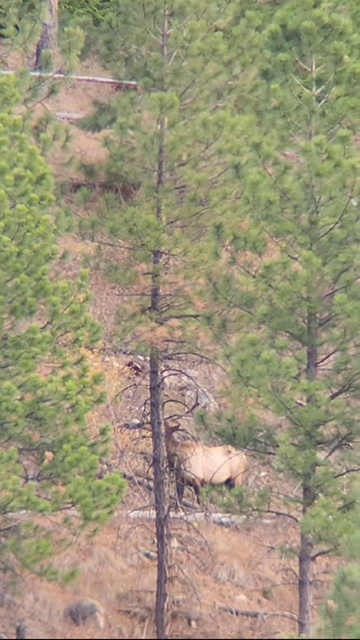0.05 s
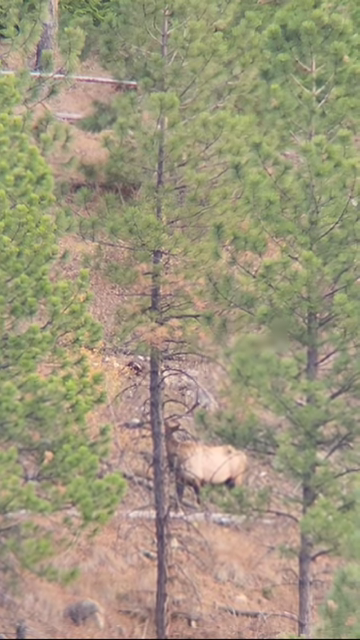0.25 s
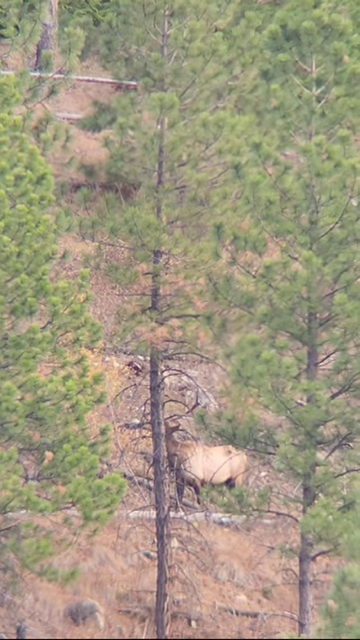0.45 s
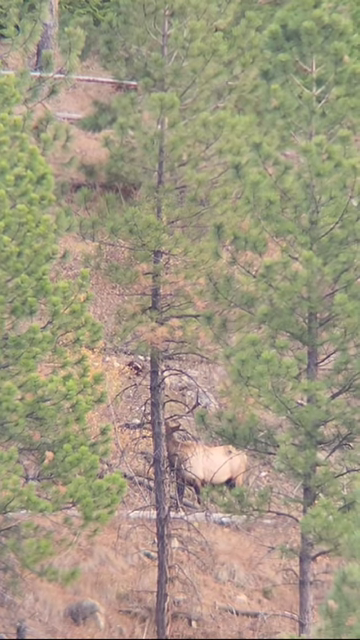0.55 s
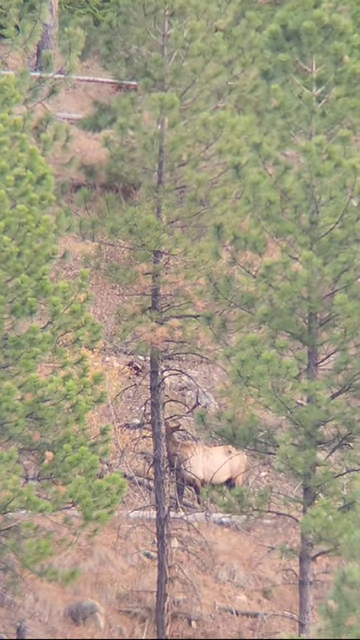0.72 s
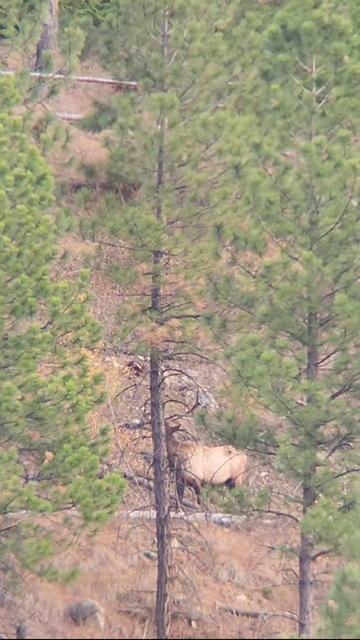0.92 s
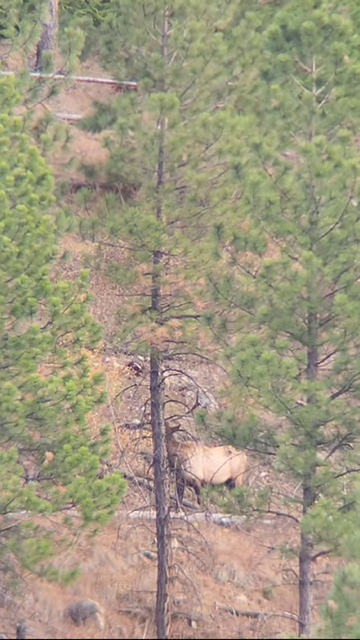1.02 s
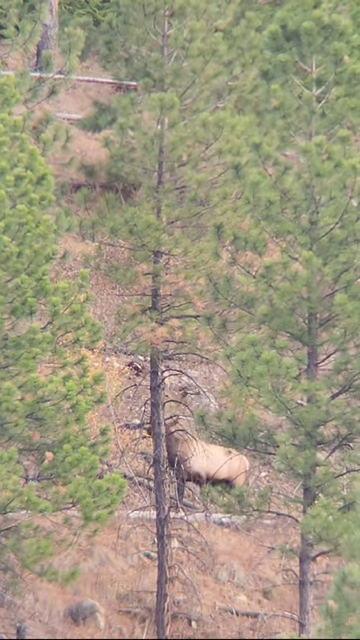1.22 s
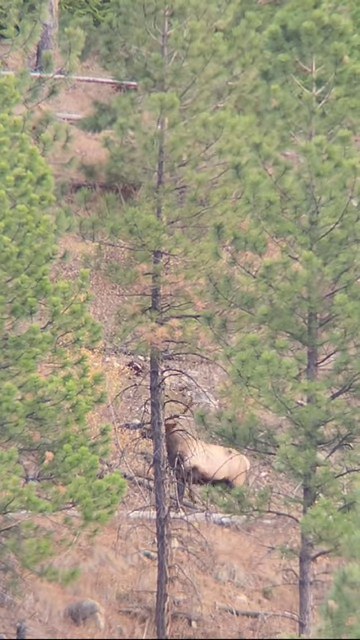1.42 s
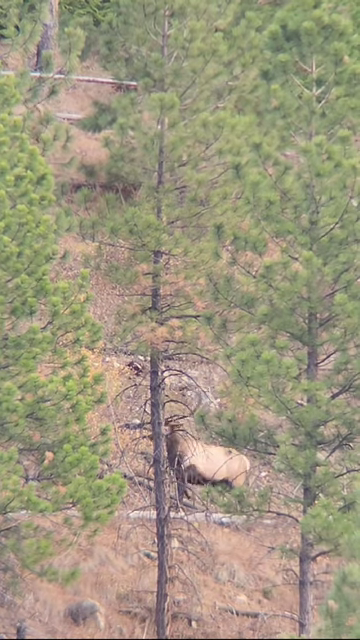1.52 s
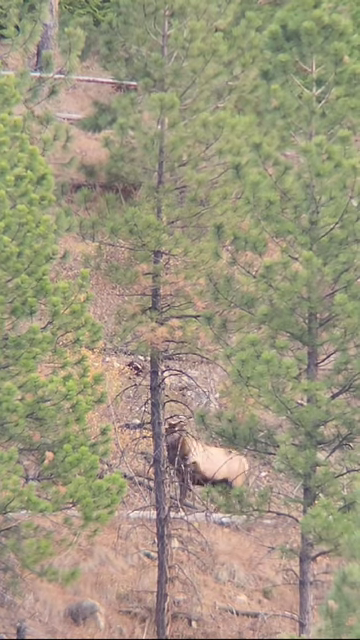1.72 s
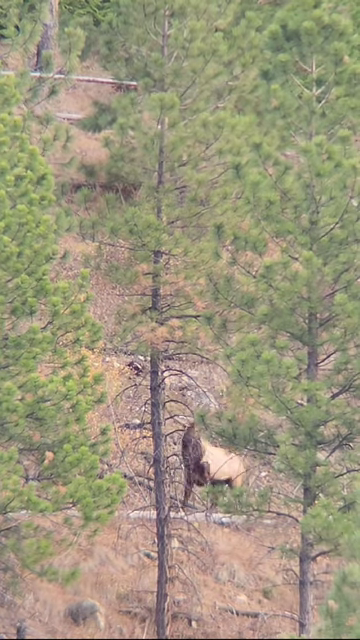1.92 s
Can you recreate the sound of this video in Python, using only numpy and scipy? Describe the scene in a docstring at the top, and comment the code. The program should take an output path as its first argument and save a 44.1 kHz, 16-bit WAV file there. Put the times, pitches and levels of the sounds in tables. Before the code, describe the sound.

One sharp, overloaded gunshot outdoors, then clattering echoes and low thumps dying away among trees

```python
"""A faint outdoor hush on a wooded hillside, then one rifle shot close to two microphones, with a pre-echo (noise
swelling until the shot) smeared ahead of it. The blast is N-shaped shock fronts, a ring of decaying sines,
a noise roar and a noise spray from nearby ground and trunks; it overloads the input. Trunks and slopes send it
back as shaped noise that the air dulls with distance, with low thumps (windowed sines), sharper slaps (noise
bursts with a ring) and clean cracks."""
import sys
import numpy as np
from scipy import signal
from scipy.fft import rfft, irfft
from scipy.io import wavfile
from scipy.ndimage import uniform_filter1d

SR = 44100
rng = np.random.default_rng(int(sys.argv[2]) if len(sys.argv) > 2 else 0)


def inscribe(sig):
    """Save sig as 16-bit PCM at rate SR to the path in sys.argv[1].

    A 1-D sig is mono; a 2-D sig holds one channel per row.
    Samples are clipped to [-1, 1] before scaling.
    """
    pcm = np.round(np.clip(np.atleast_2d(sig).T, -1, 1) * 32767)
    wavfile.write(sys.argv[1], SR, pcm.astype(np.int16))


def to_linear_factor(level_db):
    """Convert decibel levels (scalar or array-like) to linear amplitude factors."""
    exponent = np.asarray(level_db, float) / 20
    return 10 ** exponent


N = 85995  # length [samples]
SHOT_S = .2535

# sound coming back from the hillside:
# (time [s], hiss level [dB], rumble level [dB], low-mid body level [dB])
RETURN = [(0.3, -38, -55, -86), (0.36, -46.5, -65, -58), (0.428, -38.5, -47, -44), (0.485, -43, -53, -48.5),
          (0.51, -39.5, -48, -52), (0.545, -38.5, -54, -60), (0.585, -38.5, -46.5, -44.5),
          (0.635, -47.5, -46.5, -47.5), (0.751, -44.5, -46, -44), (0.99, -59, -53, -61),
          (1.014, -50.5, -52, -56.5), (1.07, -60, -51.5, -59.5), (1.233, -65.5, -61.5, -81),
          (1.95, -77, -83.5, -98)]


def on_log_axis(table, hz):
    """Read a (frequency [Hz], value) table on a log frequency axis."""
    table = np.array(table, float)
    return np.interp(np.log(hz), np.log(table[:, 0]), table[:, 1])


def band(spec, hz, octaves):
    """One bell-shaped band out of a spectrum, rms 1."""
    f = np.arange(spec.shape[-1]) * SR / N + 1e-3
    bell = np.exp(-.5 * (np.log2(f / hz) / octaves) ** 2)
    y = irfft(spec * bell, N)
    return y / np.sqrt(np.mean(y ** 2, axis=-1, keepdims=True))


def walk(rate):
    """Random levels held 1 / rate s and slewed twice; spread near 1."""
    k = int(SR / rate)
    held = np.repeat(rng.standard_normal(N // k + 1), k)
    return 1.1 * uniform_filter1d(uniform_filter1d(held, k), k)[:N]


def diffuse(colour, grain_db, patchy_db, flicker_db, loss_db=lambda hz: 0):
    """Sound from all around: noise in third octaves, each with its own loss over time; rms near 1 without loss."""
    # side minus mid by frequency: (frequency [Hz], level difference [dB])
    side_width = [(60, -13.5), (110, -22), (200, -3.5), (380, -10.5), (700, 3), (1290, 3.5), (2380, -2),
                  (4400, 0), (8120, 1), (15000, 0)]
    # grain: random samples of the noise are lifted
    lift = to_linear_factor(grain_db * rng.exponential(size=(2, N)))
    spec = rfft(rng.standard_normal((2, N)) * lift)
    centres = 28 * 2 ** np.arange(0, 9.3, 1 / 3)
    db = on_log_axis(colour, centres) + 10 * np.log10(centres)  # per Hz to per band
    db -= 10 * np.log10(np.sum(10 ** (db / 10)))
    out, shared = 0, walk(70)
    for hz, band_db in zip(centres, db):
        mid, side = band(spec, hz, 1 / 6)
        gain = to_linear_factor(band_db - loss_db(hz) + patchy_db * shared + flicker_db * walk(45))
        out = out + gain * (mid + to_linear_factor(on_log_axis(side_width, hz)) * side * np.array([[1], [-1]]))
    return out


def place(out, s, piece, pan_db, lag_s=0.):
    """Copy of the stereo track with a short sound laid in; pan is left minus right, lag delays the left."""
    out = out.copy()
    for ch, sign in enumerate((1, -1)):
        i = int((s + (lag_s if ch == 0 else 0)) * SR)
        n = min(len(piece), N - i)
        out[ch, i:i + n] += to_linear_factor(sign * pan_db / 2) * piece[:n]
    return out


def hush():
    """The faint outdoor background: steady coloured noise from all around."""
    # (frequency [Hz], relative density [dB per Hz])
    hush_colour = [(15, -29), (25, 13), (235, -22.5), (837, -4), (908, -12.5), (1010, -18), (1360, -16.5),
                   (15900, -70.5)]
    return to_linear_factor(-69.5) * diffuse(hush_colour, 0.19, 0.31, 1.6)


def pre_echo(t):
    """A pre-echo: noise smeared ahead of the shot, swelling until it."""
    # (frequency [Hz], relative density [dB per Hz])
    pre_echo_colour = [(24, -34.5), (40, -5), (162, -4), (606, -13.5), (1450, -8), (1770, -9.5),
                       (3740, -21), (5440, -14), (6010, -26), (7710, -16), (15500, -30.5)]
    start_s, fade_in_s, end_db, rise_db_per_s = 0.2167, 0.0044, -22, 495.5
    u = t - SHOT_S
    swell = np.clip((t - start_s) / fade_in_s, 0, 1) * to_linear_factor(end_db + rise_db_per_s * np.minimum(u, 0))
    return (u < 0) * swell * diffuse(pre_echo_colour, 0.3, 0, 0.26)


def shock_fronts():
    """Shock fronts in quick succession: pressure jumps, falls in a straight line and jumps back, an N shape."""
    # (time [s], level before the push factor [dB], length of the N [s], lag of the left microphone [s],
    #  signed factor of the first push [ratio])
    fronts = [(0.2431, -21, 0.0078, 0.00034, -2.56), (0.2517, -9, 0.00065, 0.00062, -0.5),
              (0.256, -11, 0.0017, 0.000068, -0.68), (0.257, -21, 0.00091, 0.00065, 0.38),
              (0.2607, -7, 0.0038, 0.00058, -0.94)]
    out = np.zeros((2, N))
    for s, db, length_s, lag_s, push in fronts:
        ramp = np.linspace(1, -1, int(length_s * SR))
        rounded = np.convolve(ramp, np.ones(7) / 7)
        out = place(out, s, push * to_linear_factor(db) * rounded, 0, lag_s)
    return out


def blast_ring():
    """A short ring after the shot: a sum of sines, each dying away exponentially."""
    # (frequency [Hz], starting level [dB], time to fall 60 dB [s])
    ring_modes = [(60, -13.5, 0.073), (122, -18.5, 0.13), (221, -21.5, 0.1), (454, -11.5, 0.062),
                  (780, -1, 0.031)]
    u = np.arange(SR // 5) / SR
    ring = sum(to_linear_factor(db - 60 * u / t60) * np.sin(2 * np.pi * hz * u) for hz, db, t60 in ring_modes)
    return place(np.zeros((2, N)), SHOT_S, ring, 1.5, .0003)


def gas_roar(t):
    """Roaring gas: broad noise that holds briefly, then falls exponentially."""
    roar_db, hold_s, t60_s = -16.5, .006, .05
    u = t - SHOT_S
    fall = to_linear_factor(roar_db - 60 * np.maximum(u - hold_s, 0) / t60_s)
    # (frequency [Hz], relative density [dB per Hz])
    gas_colour = [(200, -0.5), (1500, 2.5), (5000, -6), (16000, -12)]
    return (u > 0) * fall * diffuse(gas_colour, 0.55, 0, 0)


def near_spray(t):
    """Spray of echoes from the nearest ground and trunks: patchy noise falling exponentially from the shot."""
    # (frequency [Hz], relative density [dB per Hz])
    near_colour = [(35, -38.5), (60, -10), (238, -7.5), (591, -10.5), (1370, -10.5), (2290, -4),
                   (2700, -20.5), (3100, -6.5), (7530, -7), (9960, -17.5), (13200, -9), (15900, -5.5)]
    start_db, t60_s = -21, 0.24
    u = t - SHOT_S
    fall = to_linear_factor(start_db - 60 * np.maximum(u, 0) / t60_s)
    return (u > 0) * fall * diffuse(near_colour, 0.65, 3.1, 0.58)


def trunk_hiss(t):
    """Scattering from countless trunks: noise that the air dulls as it travels, more even in the treble."""
    # hiss at colour_s: (frequency [Hz], relative density [dB per Hz])
    hiss_colour = [(290, -27), (500, -8), (576, -13.5), (714, -13), (949, -13), (1210, -3.5), (2260, 0),
                   (2840, -3), (3180, -1), (8250, -8.5), (15000, -29.5)]
    # loss in the air: (frequency [Hz], extra loss per second of travel [dB/s])
    air_loss = [(300, -1), (800, -2.5), (2000, -3), (2600, 7), (3500, 14.5), (6000, 29), (9000, 62.5),
                (12000, 53), (16000, 46)]
    colour_s, even_s, even_hz = 0.39, .15, 4500
    times, hiss_db = np.array(RETURN).T[:2]
    rolling_db = np.interp(t, times, hiss_db)
    even_db = uniform_filter1d(rolling_db, int(even_s * SR))

    def loss_db(hz):
        treble_share = 1 / (1 + (even_hz / hz) ** 4)  # above even_hz the evened level takes over
        return on_log_axis(air_loss, hz) * (t - colour_s) - rolling_db + (rolling_db - even_db) * treble_share

    return diffuse(hiss_colour, 2.5, 2.0, 2.5, loss_db)


def low_rumble(t):
    """The bass of the returning sound: low noise that follows the rumble level."""
    # (frequency [Hz], relative density [dB per Hz])
    rumble_colour = [(15, -45), (25, -12.5), (97, 6.5), (121, -2.5), (239, -26), (389, -20.5), (452, -18.5),
                     (500, -24.5), (650, -47), (1100, -120)]
    times, _, rumble_db, _ = np.array(RETURN).T
    return to_linear_factor(np.interp(t, times, rumble_db)) * diffuse(rumble_colour, 0.87, 0.2, 0.5)


def low_mid_body(t):
    """The rolling low-mid body of the returning sound: noise that follows the body level."""
    # (frequency [Hz], relative density [dB per Hz])
    body_colour = [(76, -28), (130, 2), (274, -13), (438, -15), (475, -13), (519, -15.5), (900, -20),
                   (1170, -46), (1980, -120)]
    times, _, _, body_db = np.array(RETURN).T
    return to_linear_factor(np.interp(t, times, body_db)) * diffuse(body_colour, 3.0, 0.8, 0.96)


def hillside(t):
    """Hiss, rumble and body from trunks and slopes, fading in together over 38 ms from the shot."""
    gate = np.clip((t - SHOT_S) / 0.038, 0, 1)
    return gate * (trunk_hiss(t) + low_rumble(t) + low_mid_body(t))


def thumps():
    """Low thumps and short ringing returns from single slopes: a few sine cycles under a bell-shaped window."""
    # (time [s], peak level [dB], frequency [Hz], left minus right [dB], length, at least 1 [cycles])
    slope_thumps = [(0.285, -38, 718, -8, 26), (0.314, -39.5, 412, -1, 12.6), (0.499, -43, 489, -2, 29.7),
                    (0.315, -36, 110, 4.5, 3.9), (0.37, -24.5, 109, -2.5, 4.3),
                    (0.435, -22, 134.7, 0.5, 3.73), (0.53, -42, 108, 8, 1.8), (0.573, -55, 91, 2, 3.8),
                    (0.617, -30.5, 143, 0, 0.93), (0.645, -35, 99, 4, 2.1), (0.676, -34.5, 102, -3.5, 4.8),
                    (0.735, -39.5, 115.5, 3, 4.3), (0.759, -34.5, 134.6, 0, 2.6),
                    (0.775, -37.5, 120, -0.5, 2.1), (0.81, -24.5, 199, 1.5, 2.26),
                    (0.847, -27.5, 161, 1, 3.05), (0.863, -28, 201, 2, 1.65),
                    (0.878, -36.5, 100.3, -3, 1.8), (0.9, -32, 240, 1.5, 3.1), (0.928, -40, 151, 0, 2.1),
                    (1, -43, 110, -1, 2.4), (1.038, -57, 82.3, 5, 6), (1.086, -49, 114.3, -1, 2.3),
                    (1.148, -51.5, 96.6, 1, 1.9), (1.203, -46, 93, -0.5, 4.1),
                    (1.249, -47, 96.3, 0.5, 3.83), (1.329, -55, 62.75, -2.5, 2.24),
                    (1.367, -48, 96, 0.5, 4.3), (1.39, -45.5, 88.1, 0.5, 3.64),
                    (1.488, -54.5, 92.6, -0.5, 3.2), (1.56, -51, 86.5, 1, 2.5),
                    (1.622, -49.5, 82.7, -1.5, 2.1), (1.664, -59.5, 76.6, 0.0, 4),
                    (1.72, -59, 99.7, 3, 2.8), (1.898, -64, 83.3, 4, 4)]
    out = np.zeros((2, N))
    for s, db, hz, pan_db, cycles in slope_thumps:
        u = np.arange(int(max(cycles, 1) / hz * SR)) / SR
        out = place(out, s, to_linear_factor(db) * np.hanning(len(u)) * np.sin(2 * np.pi * hz * u), pan_db)
    return out


def slap(spec, s, hz, t60):
    """One sharp echo: a short burst of coloured noise with a ring at its centre frequency, peak 1."""
    rise_s, ring_size = 0.00089, 1.1
    u = np.arange(SR // 10) / SR
    i = int(s * SR) - len(u)  # each time takes its own stretch of the noise
    octaves = 0.53 * min(np.sqrt(hz / 2000), 2000 / hz)  # narrower away from 2 kHz
    noise = band(spec, hz, octaves)[i:i + len(u)]
    ring = ring_size * np.sin(2 * np.pi * hz * u)
    y = (1 - np.exp(-u / rise_s)) * to_linear_factor(-60 * u / t60) * (noise + ring)
    return y / np.abs(y).max()


def flutter(spec):
    """A random flutter of small slaps whose level follows the hiss."""
    per_s, over_hiss_db, spread_db, t60_s = 55, 4, 3, 0.032
    centre_hz, spread_octaves = 1200, .55
    times, hiss_db = np.array(RETURN).T[:2]
    count = int(per_s * (N / SR - times[0]))
    out = np.zeros((2, N))
    for k, (a, b, c, d) in enumerate(rng.standard_normal((count, 4))):
        s = times[0] + (k + np.tanh(a)) / per_s
        db = np.interp(s, times, hiss_db) + over_hiss_db + spread_db * np.clip(b, -2, 1.5)
        hz = centre_hz * 2 ** (spread_octaves * np.clip(c, -2, 1.2))
        out = place(out, s, to_linear_factor(db) * slap(spec, s, hz, t60_s), 4.1 * d, 0.00066 * np.tanh(d))
    return out


def slaps(spec):
    """Sharper echoes from single slopes, reaching the left microphone slightly first."""
    # (time [s], peak level [dB], frequency [Hz], left minus right [dB], time to fall 60 dB, at least 0.01 [s])
    slope_slaps = [(0.331, -28, 2070, -2, 0.057), (0.402, -37.5, 1904, 28.5, 0.03),
                   (0.426, -40.5, 2305, 34, 0.013), (0.45, -33.5, 1369, 22.5, 0.082),
                   (0.468, -30, 1080, 14, 0.013), (0.5, -26.5, 2367, 1, 0.068),
                   (0.514, -36, 2230, 10, 0.058), (0.572, -31, 415, 0.5, 0.084),
                   (0.598, -42, 435, 9, 0.082), (0.674, -39.5, 521, 1, 0.16), (0.737, -35, 1780, 6, 0.062),
                   (0.773, -28, 344, 0.5, 0.027), (0.786, -38.5, 1830, 23, 0.072),
                   (0.847, -37.5, 580, -1, 0.039), (0.9, -37.5, 386, 0, 0.032),
                   (0.812, -36, 530, -1, 0.026), (1.004, -53, 2020, 22, 0.062),
                   (1.015, -44.5, 1910, 20.5, 0.056), (1.029, -46, 691, 4, 0.078),
                   (1.108, -50, 532, 4.5, 0.11), (1.165, -44, 649, 6, 0.044), (1.215, -51, 775, 9.5, 0.078),
                   (1.264, -54, 1700, 10, 0.08), (1.343, -54.5, 823, 7, 0.067),
                   (1.397, -52.5, 1617, 11, 0.09), (1.438, -54.5, 1513, 9, 0.05),
                   (1.486, -50.5, 759, 3.5, 0.062), (1.541, -64, 3770, 4, 0.035),
                   (1.571, -53, 780, 12.5, 0.14), (1.628, -56, 806, 7.5, 0.1),
                   (1.667, -58.5, 627, 3, 0.036), (1.764, -59, 698, 8.5, 0.063),
                   (1.929, -61, 1297, 16, 0.094)]
    out = np.zeros((2, N))
    for s, db, hz, pan_db, t60 in slope_slaps:
        out = place(out, s, to_linear_factor(db) * slap(spec, s, hz, max(t60, .01)), pan_db, -0.00033)
    return out


def cracks():
    """Clean returns of the shock front: the N shape again, its treble rounded off by the air."""
    # (time [s], level of the N before rounding [dB], left minus right [dB])
    front_returns = [(.4685, -28, 0), (.5815, -28, 2), (.651, -21, 4), (.849, -29, 2), (1.487, -53, 2),
                     (1.586, -50, 2)]
    length_s, top_hz = .0005, 3600
    front = np.r_[np.linspace(1, -1, int(length_s * SR)), np.zeros(SR // 100)]
    front = signal.sosfilt(signal.butter(4, top_hz, fs=SR, output="sos"), front)
    out = np.zeros((2, N))
    for s, db, pan_db in front_returns:
        out = place(out, s, to_linear_factor(db) * front, pan_db, -0.00016)
    return out


def scene():
    """All layers in stereo."""
    t = np.arange(N) / SR
    blast = shock_fronts() + blast_ring() + gas_roar(t) + near_spray(t)
    slap_spec = rfft(rng.standard_normal(N)) / np.arange(1, N // 2 + 2)  # noise, falling 6 dB per octave
    echoes = thumps() + flutter(slap_spec) + slaps(slap_spec) + cracks()
    return hush() + pre_echo(t) + blast + hillside(t) + echoes


def roll_off(x):
    """The treble ends steeply here."""
    return signal.sosfilt(signal.butter(12, 15800, fs=SR, output="sos"), x)


def record(dry):
    """The microphones lose the deepest bass; the input rounds off the blast; a low-pass removes the top."""
    mic_low_hz, clip_level, top_hz = 48.57, .8, 15800
    heard = signal.sosfilt(signal.butter(2, mic_low_hz, "high", fs=SR, output="sos"), dry)
    overloaded = clip_level * np.tanh(heard / clip_level)
    mix = signal.sosfilt(signal.ellip(8, .2, 70, top_hz, fs=SR, output="sos"), overloaded)
    return roll_off(mix)


dry = scene()
out = record(dry)
inscribe(out)
```